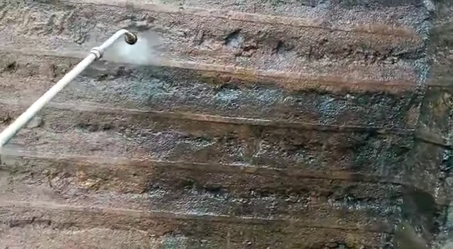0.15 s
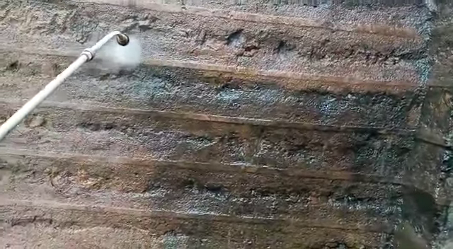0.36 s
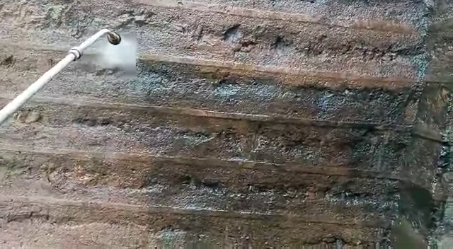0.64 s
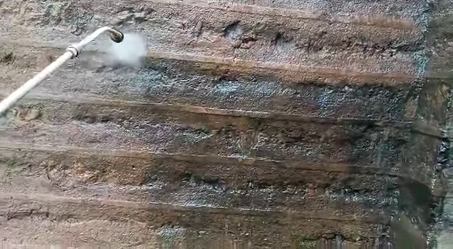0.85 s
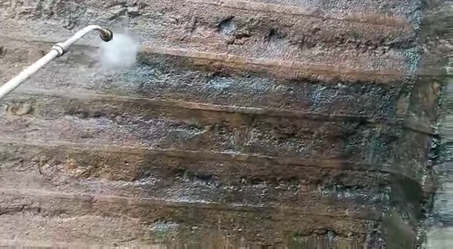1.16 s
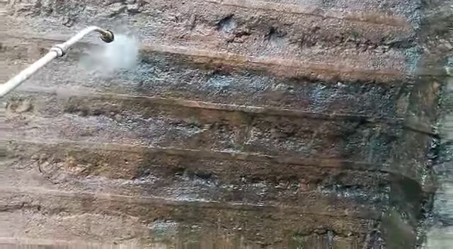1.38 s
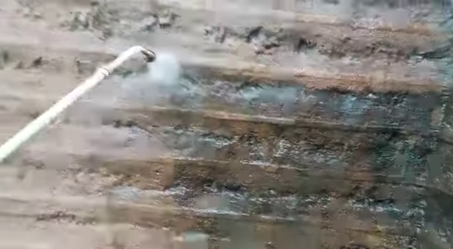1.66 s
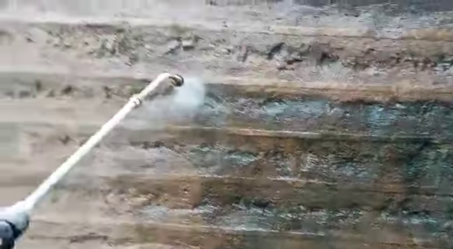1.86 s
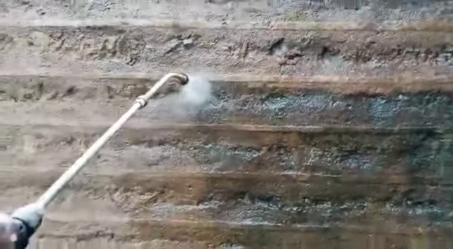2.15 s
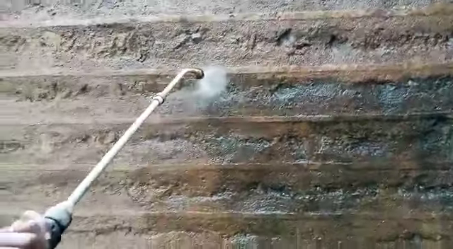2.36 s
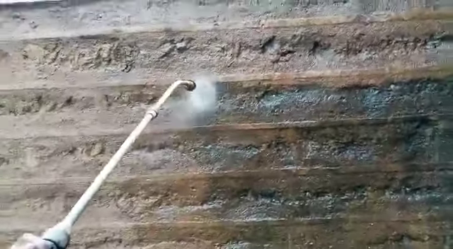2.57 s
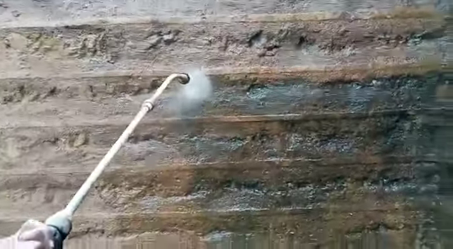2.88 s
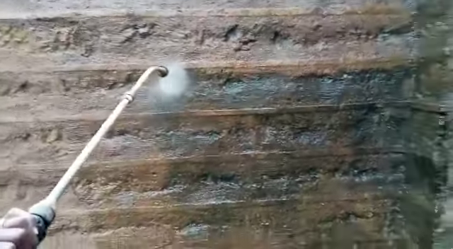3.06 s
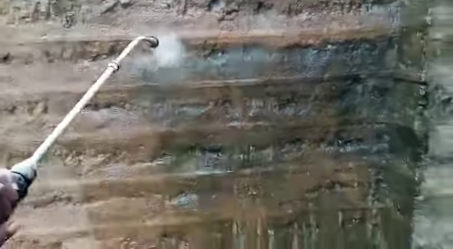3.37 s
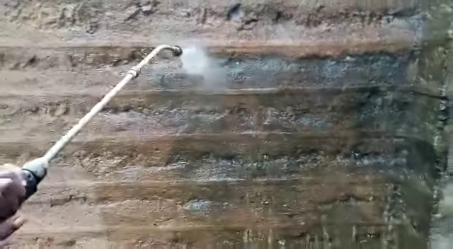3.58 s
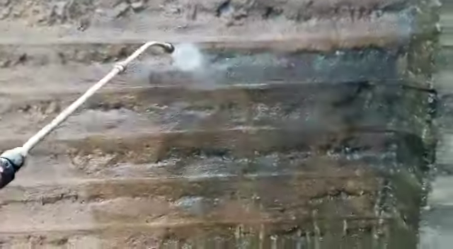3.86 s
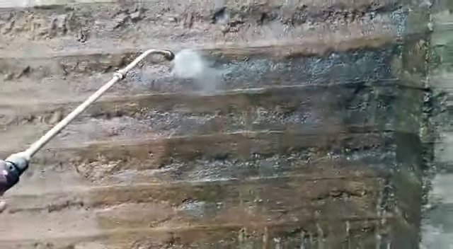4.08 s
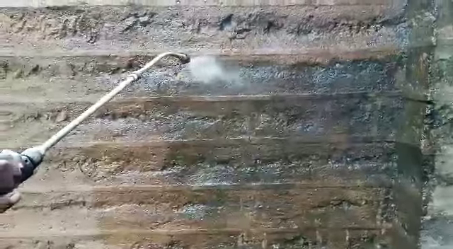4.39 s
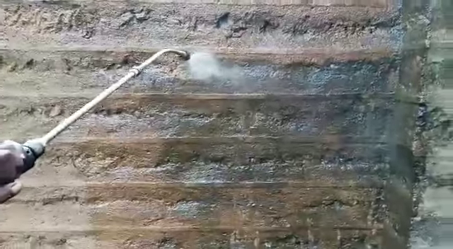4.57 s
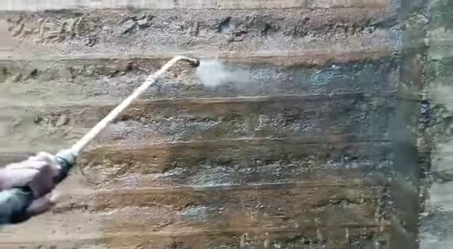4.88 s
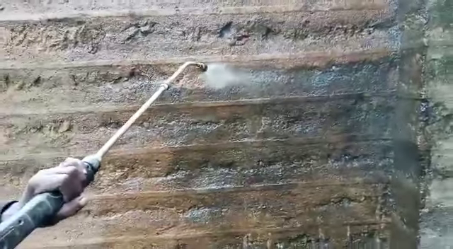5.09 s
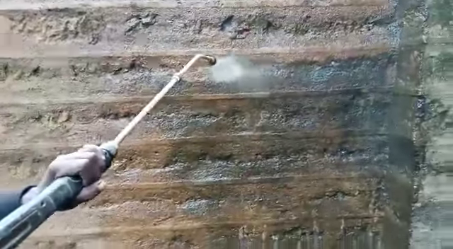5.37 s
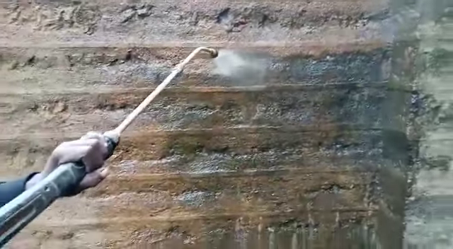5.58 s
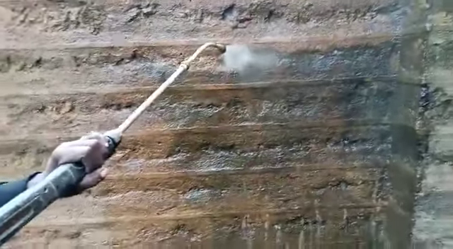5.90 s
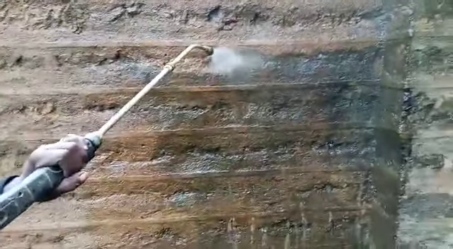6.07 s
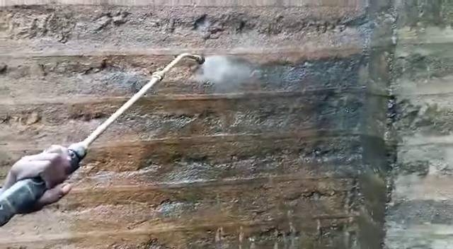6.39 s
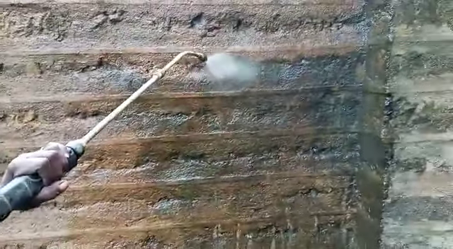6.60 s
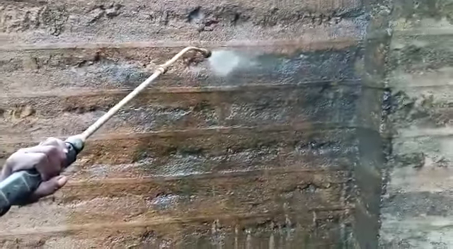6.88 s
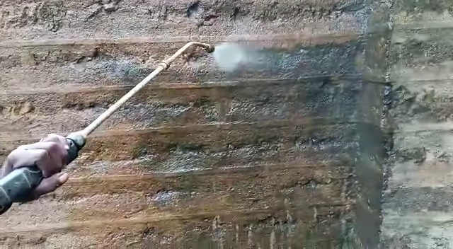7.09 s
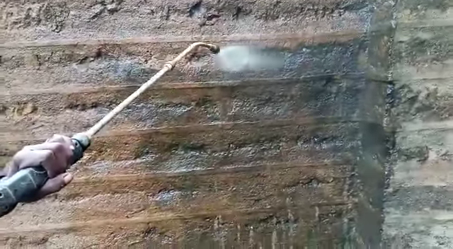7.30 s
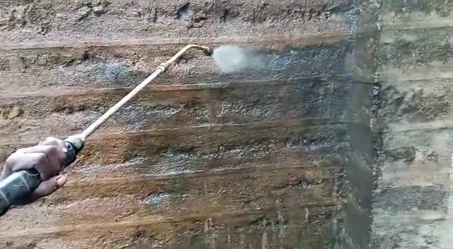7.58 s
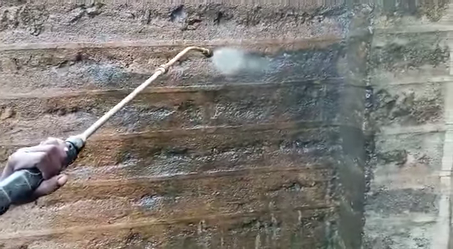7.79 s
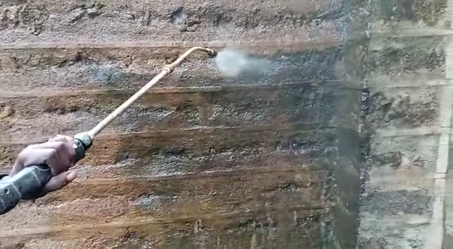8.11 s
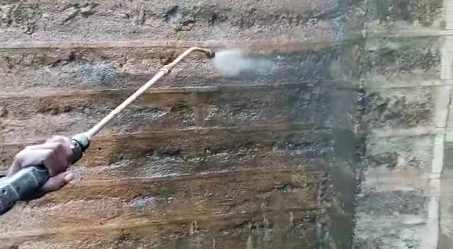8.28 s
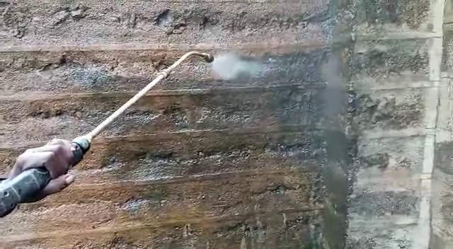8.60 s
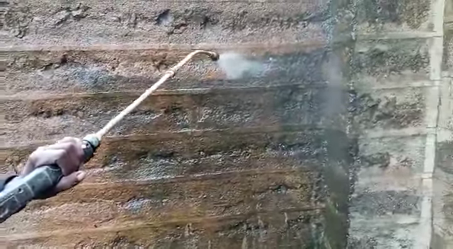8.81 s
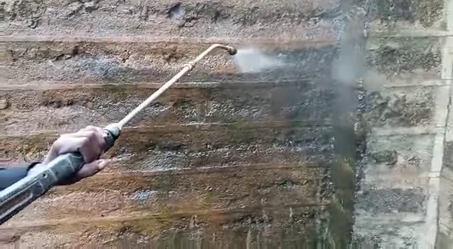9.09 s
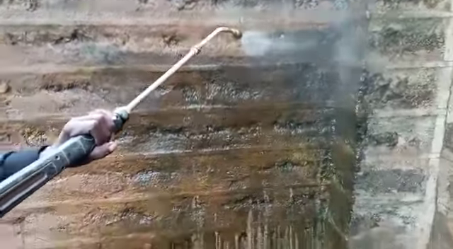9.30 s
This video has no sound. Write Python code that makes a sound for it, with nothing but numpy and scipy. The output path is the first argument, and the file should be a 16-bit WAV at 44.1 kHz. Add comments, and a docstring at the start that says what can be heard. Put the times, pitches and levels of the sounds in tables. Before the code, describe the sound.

A pressure washer jet hisses loudly and steadily against a stone wall outdoors, over a faint motor hum, with wind puffs thumping the microphone.

```python
"""A pressure washer's jet hisses on a stone wall: filtered noise that throbs with the pump's strokes.
At first the motor hums over a faint pump and a far engine drones, both as wavering tones.
Single puffs of wind, bursts of low swings, thump from about one second on, most densely near six seconds.
Towards the end the hiss weakens and loses its throb, the pump hums louder, and motor and drone fade.
Two handheld microphones hear it: the right one about a millisecond nearer, the left one louder."""
import sys
import numpy as np
from scipy import signal
from scipy.io import wavfile
from scipy.ndimage import uniform_filter1d

SR = 44100
rng = np.random.default_rng(int(sys.argv[2]) if len(sys.argv) > 2 else 0)


def waveform_to_disk(signal):
    """Save audio, clipped to [-1, 1], as 16-bit WAV at the path in sys.argv[1]."""
    frames = np.transpose(np.atleast_2d(signal))
    scaled = np.clip(frames, -1, 1) * 32767
    samples = np.round(scaled).astype(np.int16)
    wavfile.write(sys.argv[1], SR, samples)


N = 416744
# noise is shaped in short overlapping frames of 1024 samples, one every 256
FRAMES, HZ = N // 256 + 5, np.fft.rfftfreq(1024, 1 / SR)
TIMES = np.arange(FRAMES) * 256 / SR


def gain_of(db):
    """Turns decibels into a loudness factor."""
    return 10 ** (np.asarray(db) / 20)


def evened(x):
    """Scales a signal to an average strength (rms) of 1."""
    return x / np.sqrt(np.mean(x ** 2) + 1e-20)


def over_hz(points, axis=1):
    """Reads one column of a colour table at every frequency bin."""
    table = np.transpose(points)
    return np.interp(np.log(HZ + 1), np.log(table[0] + 1), table[axis])[:, None]


def over_time(rows, t):
    """Reads every column of a table over time at the times t."""
    s, *columns = np.transpose(rows)
    return np.array([np.interp(t, s, column) for column in columns])


def wander(seconds):
    """A smooth random curve of rms 1: noise averaged twice over the given time."""
    size = max(int(seconds * SR), 1)
    smoothed_once = uniform_filter1d(rng.standard_normal(N), size)
    return evened(uniform_filter1d(smoothed_once, size))


def patches(bins, frames):
    """Random patches over frequency and time, rms 1."""
    field = rng.standard_normal((FRAMES, len(HZ))).T
    across_hz = uniform_filter1d(field, max(int(bins), 1), 0)
    return evened(uniform_filter1d(across_hz, max(int(frames), 1), 1))


def sound(z):
    """Turns short-time spectra into samples."""
    return signal.istft(z, nperseg=1024, noverlap=768)[1][:, :N]


def dip(hz, width):
    """A bell-shaped curve of height 1 over the frequency bins."""
    return np.exp(-((HZ[:, None] - hz) / width) ** 2)


# how much later the left microphone hears the jet than the right one: (time_s, lag_ms)
LAG = [(0, 1.06), (1.35, 1.075), (1.75, 1.01), (2.5, .985), (3.3, 1.02), (3.8, .99), (5.7, .945),
       (8.5, .957), (9.45, .937)]
# how alike the noise is at both microphones: (pitch_hz, likeness_0_to_1)
SAME = [(60, .72), (300, .9), (900, .75), (1600, .62), (3000, .5), (10000, .45), (15000, .3)]


def pair():
    """Noise at two spaced microphones: partly shared, with the left one delayed by the longer path."""
    a, b, c, d = rng.standard_normal((FRAMES, len(HZ), 4)).T
    same = np.clip(over_hz(SAME), 0, 1)
    right = a + 1j * b
    left_only = c + 1j * d
    # turning the phase in step with frequency delays the sound
    late = np.exp(-2j * np.pi * HZ[:, None] * over_time(LAG, TIMES) / 1000)
    left = late * (same * right + np.sqrt(1 - same ** 2) * left_only)
    return np.array([left, right])


# reflections off nearby surfaces, which shift with the lag:
# (microphone_0_left_1_right, delay_ms at 1 ms lag, gain at 1 ms lag,
#  delay_change_ms_per_ms of lag, gain_change_per_ms of lag)
ECHOES = [(0, 1.68, .06, 1.1, 0), (0, 1.39, .07, .9, .2), (0, 1.53, -.14, .9, -.3), (1, 1.56, .05, .3, .7),
          (1, 1.18, .07, 0, -.3), (1, 1.83, .04, 0, -1)]


def reflections():
    """Delayed copies add to and cancel the direct sound, leaving ripples in the colour."""
    out = np.ones((2, len(HZ), FRAMES), complex)
    shift = over_time(LAG, TIMES) - 1
    for side, delay, gain, delay_slope, gain_slope in ECHOES:
        turns = HZ[:, None] * (delay + delay_slope * shift) / 1000
        softer_treble = (HZ[:, None] / 11000) ** 2
        out[side] += (gain + gain_slope * shift) * np.exp(-2j * np.pi * turns - softer_treble)
    return out


SLOW_START, SETTLE_S = .013, .75  # share under full speed at the start; settling time in seconds
PUMP_HZ, MOTOR_HZ = 107.6, 198.5  # at full speed


def strokes():
    """Running time of the machine in seconds at full speed: it starts slightly slow and settles."""
    speed = 1 - SLOW_START * np.exp(-np.arange(N) / SR / SETTLE_S)
    return np.cumsum(speed) / SR


# the jet as the lance wanders: (time_s, hiss_change_db, pump_throb_depth_0_to_1)
JET = [(0, 2.1, 0.3), (1.5, 2.5, 0.1), (2.5, 2.5, 0), (3.8, 2.5, 0.07), (5, 3.4, 0.6), (5.4, 1.9, 0.25),
       (6.6, 2.3, 0.34), (8.6, 0.1, 0), (9.45, -1, 0)]
# colour of the jet at each microphone: (pitch_hz, left_db, right_db)
COLOUR = [(430, -15.5, -27), (742, -3.5, -7), (1170, -4.5, -8.5), (1600, 1, -4.5), (3600, 2, -3),
          (4800, 0.5, -3.5), (5620, 4.5, -1), (6650, 12, 0), (7820, 4.5, -5), (8170, 0, -4.5),
          (10060, -4, -0.5), (13900, -12, -7), (14370, 1.5, 1.5), (15400, 2.5, 6)]
# narrow dips and bumps in that colour: (pitch_hz, width_hz, left_db, right_db)
DIPS = [(456, 27, 0.5, 0), (2094, 120, -3, -6), (2490, 99, -0.5, -2.5), (4790, 78, -0.5, 3),
        (1800, 100, 2.5, -1.5)]
# a dip on the left, briefly a small bump, that shifts as the lance moves: (time_s, pitch_hz, level_db)
MOVING_DIP = [(0, 1200, -7), (1.5, 1240, 1), (1.9, 1610, -3.5), (3, 1640, -9), (4, 1610, -4.5),
              (9.45, 1443, -5)]
JET_DB = -18.5  # average over both microphones
SPLASH_FOLLOWS, FIZZ_FOLLOWS = .4, .05  # share of the hiss change taken by low splash and fine fizz
SPLASH_THROB, FIZZ_THROB = .12, .5  # throb depth 0-1
SPLASH_DB_PER_MS = 9.5  # the low splash grows as the lag grows


def jet():
    """Water breaking up on stone makes broad noise; pump strokes pulse it and drops roughen it."""
    hiss_db = over_time(JET, TIMES)[0]
    octave = np.log2(HZ[:, None] + 1)
    # three bands: splash fades out up to 5500 Hz, fizz fades in from 8000 Hz, hiss lies between
    low = np.clip((np.log2(5500) - octave) / .5, 0, 1)
    high = np.clip((octave - np.log2(8000)) / 0.58, 0, 1)
    middle = 1 - low - high
    level_db = hiss_db * (middle + low * SPLASH_FOLLOWS + high * FIZZ_FOLLOWS)
    level_db += low * SPLASH_DB_PER_MS * (over_time(LAG, TIMES) - 1)
    level_db = level_db + 15.0 * np.minimum(octave - np.log2(400), 0)  # the small jet makes little bass

    # many fainter reflections add small, slowly shifting ripples, strongest in the low band
    ripple_db = .7 + .4 * low
    colour_db = np.array([over_hz(COLOUR, axis=k) + ripple_db * patches(3, 60) for k in (1, 2)])
    for hz, width, *dbs in DIPS:
        colour_db += np.reshape(dbs, (2, 1, 1)) * dip(hz, width)
    moving_hz, moving_db = over_time(MOVING_DIP, TIMES)
    colour_db[0] += moving_db * dip(moving_hz, 99)
    bumpy_db = 1.0 * patches(40, 4)  # the jet crosses bumps and grooves in the stone
    z = pair() * reflections() * gain_of(colour_db + level_db + bumpy_db)

    # each stroke is a surge with a sharper top; the left microphone hears it later
    t = np.arange(N) / SR
    late = [[1], [0]] * over_time(LAG, t) / 1000
    turn = 2 * np.pi * PUMP_HZ * (strokes() - late)
    stroke_shape = np.cos(turn) + .25 * np.cos(2 * turn - .3)
    surge = stroke_shape * gain_of(3.2 * wander(.03) - .6)
    hiss_depth = over_time(JET, t)[1]
    spatter_db = 1.3 * wander(0.0016) + 0.45 * wander(0.031)  # drops arrive in clumps

    mix = 0
    # band, throb depth, share of the spatter
    for band, depth, share in [(low, SPLASH_THROB, .3), (middle, hiss_depth, .6), (high, FIZZ_THROB, .8)]:
        throb = np.sqrt(np.clip(1 + depth * surge, .05, 4))
        mix = mix + sound(z * band) * throb * gain_of(share * spatter_db)
    return gain_of(JET_DB) * evened(mix)


# hum of the machine: (time_s, pump_first_tone_db, swell_of_second_and_third_tones_db, motor_db)
HUM = [(0, -59.5, -3, -46.5), (1.5, -55.5, 3.5, -44.5), (2.5, -60, -6, -45), (3.2, -49, 0, -46),
       (4.5, -47, 1.5, -48.5), (6.2, -45, 3.5, -56), (7.2, -45, -7, -52), (8.25, -43.5, -4, -62),
       (9.45, -43.5, -0.5, -61)]
# pump tones at 2 to 6 times its pitch, before swell and drift: level_db
OVERTONES_DB = [-51.5, -52, -55, -60.5, -54]
OVERTONE_DRIFT_DB, OVERTONE_DRIFT_S = 1.5, 0.9


def hum():
    """The turning pump gives six tones at whole multiples of its pitch, the motor one; all waver."""
    t = np.arange(N) / SR
    first_db, swell_db, motor_db = over_time(HUM, t)
    pump_db = [first_db] + [db + OVERTONE_DRIFT_DB * wander(OVERTONE_DRIFT_S) for db in OVERTONES_DB]
    pump_db[1:3] = [db + swell_db for db in pump_db[1:3]]
    late = over_time(LAG, t)[0] / 1000
    out = np.zeros((2, N))
    tones_hz = [k * PUMP_HZ for k in range(1, 7)] + [MOTOR_HZ]
    delays = [0.49, 0.59, 1.02, 0.82, 1.3, 0.96, 1.1]  # left delay as a share of the jet's
    right_db = [-1.0, 0.0, -4.5, -0.5, -0.5, 2.5, -2.0]  # right level against left
    for hz, db, share, side_db in zip(tones_hz, pump_db + [motor_db], delays, right_db):
        turn = 2 * np.pi * (hz * strokes() + rng.random())
        turn = turn + 0.0011 * hz * wander(0.036)  # higher tones waver more
        level = np.sqrt(2) * gain_of(db + 2.05 * wander(0.026))
        left = np.cos(turn - 2 * np.pi * hz * share * late)
        right = gain_of(side_db) * np.cos(turn)
        out += level * np.array([left, right])
    return out


# wind puffs: (peak_s, level_db at the peak, microphone_0_left_1_right)
PUFFS = [(0.966, -37, 0), (2.217, -33, 0), (2.374, -33, 0), (2.746, -29, 0), (2.953, -36, 0),
         (3.87, -30.5, 0), (5.042, -28.5, 0), (5.147, -31.5, 0), (5.732, -26, 0), (5.772, -32, 0),
         (5.838, -32, 1), (5.961, -31, 0), (6.138, -31, 0), (6.179, -35, 0), (6.225, -34, 0),
         (6.308, -29, 0), (6.358, -38, 0), (6.413, -38, 0), (6.53, -27.5, 0), (6.974, -32, 0),
         (8.416, -34, 0), (8.494, -35, 0), (8.91, -32, 0), (9.072, -29.5, 0), (9.174, -27, 0),
         (9.347, -34, 0), (9.44, -32, 0)]


def wind():
    """Wind pushing on one microphone at a time: each puff is a short burst of uneven low swings."""
    out = np.zeros((2, N + SR))
    t = np.arange(-2000, 3000) / SR
    swings_hz = (73, 112, 145.0, 191, 269, 344, 445)
    gains = (0.64, 1.0, 0.9, 0.6, 0.35, 0.24, 0.1)
    chance = rng.random((len(PUFFS), 7))
    shape = np.exp(-(t / np.where(t < 0, .013, .017)) ** 2)  # rises a little faster than it falls
    for (s, db, side), draw in zip(PUFFS, chance):
        swings = sum(g * np.cos(2 * np.pi * (hz * t + p)) for hz, g, p in zip(swings_hz, gains, draw))
        at = max(round(s * SR) - 2000, 0)
        out[int(side > .5), at:at + len(t)] += gain_of(db) * evened(swings) * shape
    return out[:, :N]


# gusts under the puffs: (middle_s, half_length_s, left_db)
GUSTS = [(1, 0.22, -52), (2.5, 0.5, -41.5), (4, 0.39, -49), (5.097, 0.18, -47), (6.305, 0.72, -40.5),
         (8.3, 0.71, -46), (9.4, 0.56, -41)]
# colour of the moving air: (pitch_hz, level_db)
BREEZE_COLOUR = [(35, -32), (65, -14), (110, 6), (200, -6), (500, -26)]
CALM_DB, SHELTER_DB = -58, -31  # air between gusts; gusts on the right against the left


def breeze():
    """Uneven air movement makes lumpy low noise, unrelated between the microphones."""
    a, b = rng.standard_normal((FRAMES, len(HZ), 2, 2)).T
    lumps_db = np.array([2.5 * patches(8, 5) for _ in range(2)])
    lumps = evened(sound((a + 1j * b) * gain_of(over_hz(BREEZE_COLOUR) + lumps_db)))
    t = np.arange(N) / SR
    gusts = sum(gain_of(db) * np.exp(-((t - s) / half) ** 2) for s, half, db in GUSTS)
    return lumps * (gain_of(CALM_DB) + gusts * gain_of([[0], [SHELTER_DB]]))


# colour of the low body noise: (pitch_hz, level_db)
RUMBLE = [(40, -29), (80, -19), (110, -8), (150, -10), (180, -10), (300, -1.5), (400, -6.5), (520, -9),
          (800, -36)]
RUMBLE_DB = -45  # the right side is then lowered


def rumble():
    """Low body noise of the machine and the yard, with a slowly shifting colour."""
    z = pair() * gain_of(over_hz(RUMBLE) + 1.76 * patches(4.7, 28))
    return evened(sound(z)) * gain_of(RUMBLE_DB + np.array([[0], [-3.5]]))


# a far engine, heard at four and five times its turning speed:
# (time_s, speed_hz, fourth_tone_db, fifth_tone_db)
DRONE = [(0, 29.2, -60, -51), (2.3, 30.77, -54.5, -54), (4.2, 31.64, -59, -67), (5.8, 32, -55, -75),
         (7, 31.8, -90, -75)]


def drone():
    """Engine tones glide with its turning speed; two soft ones reach both microphones together."""
    hz, *levels_db = over_time(DRONE, np.arange(N) / SR)
    turn = 2 * np.pi * np.cumsum(hz) / SR
    tones = 0
    for order, db in zip((4, 5), levels_db):
        tones = tones + gain_of(db + 1.5 * wander(.1)) * np.cos(order * turn)
    return np.sqrt(2) * tones * gain_of([[0], [-1.5]])


def scene():
    """Adds the jet, machine, wind and far engine together."""
    return jet() + hum() + wind() + breeze() + rumble() + drone()


EDGE_HZ = 15730


def record(dry):
    """The recorder's band limit: a steep filter removes the sound above the edge."""
    low_pass = signal.firwin(1023, EDGE_HZ, window=("kaiser", 9), fs=SR)
    return signal.oaconvolve(dry, low_pass[None], "same")


dry = scene()
out = record(dry)
waveform_to_disk(out)
```